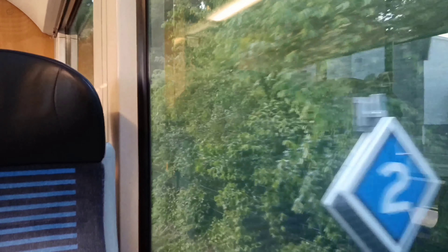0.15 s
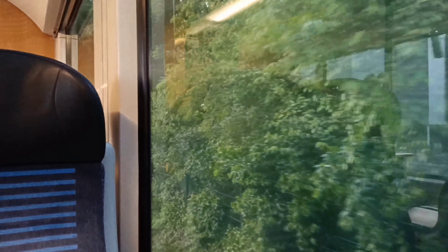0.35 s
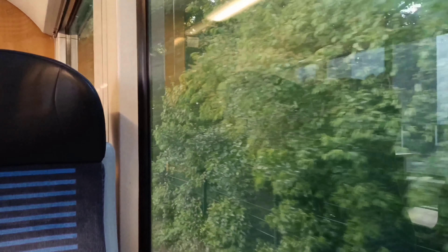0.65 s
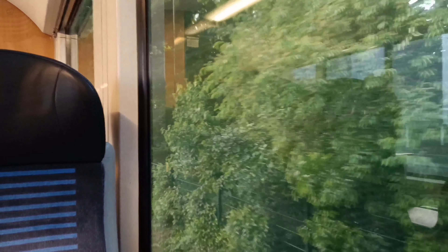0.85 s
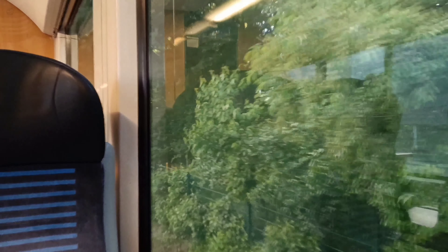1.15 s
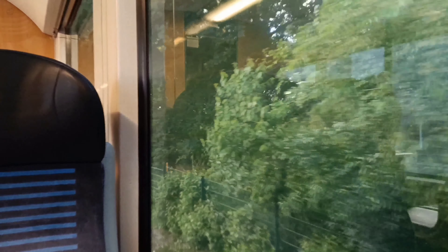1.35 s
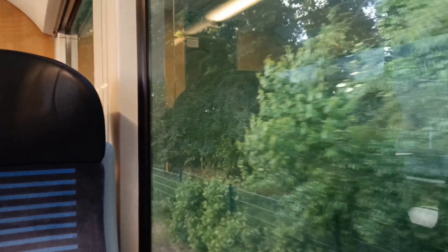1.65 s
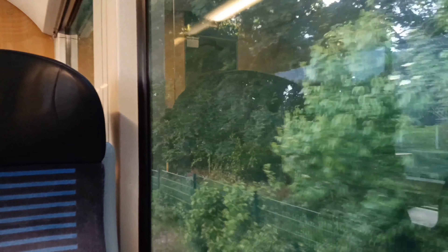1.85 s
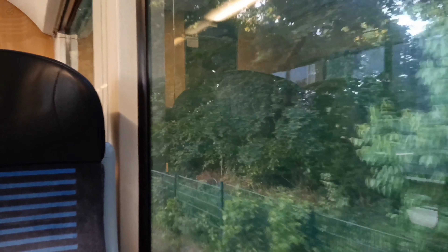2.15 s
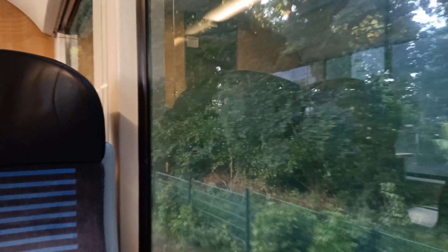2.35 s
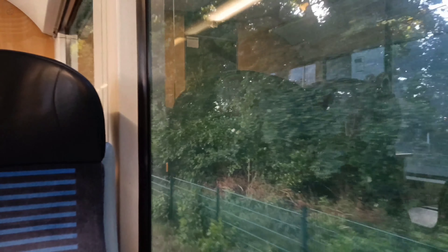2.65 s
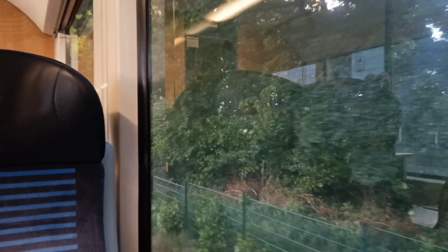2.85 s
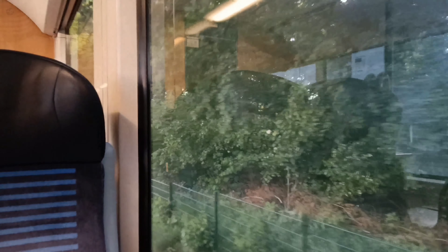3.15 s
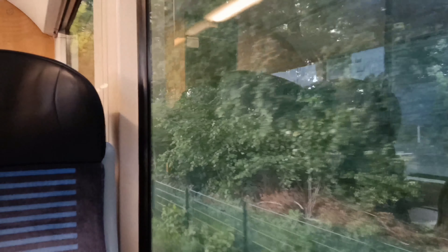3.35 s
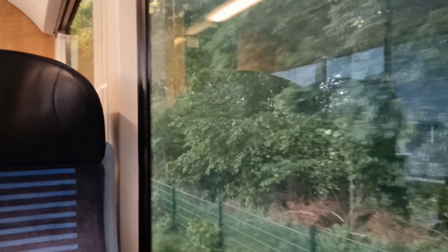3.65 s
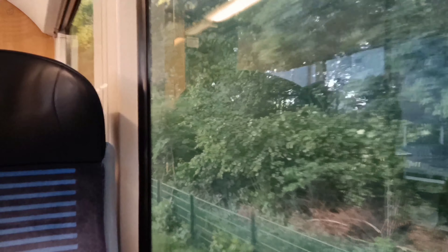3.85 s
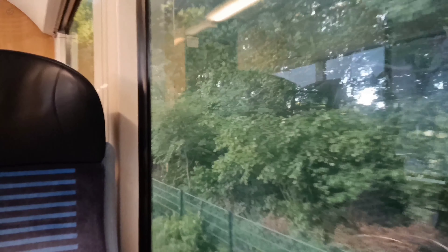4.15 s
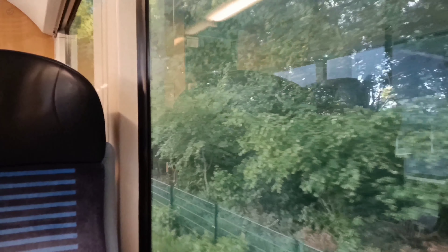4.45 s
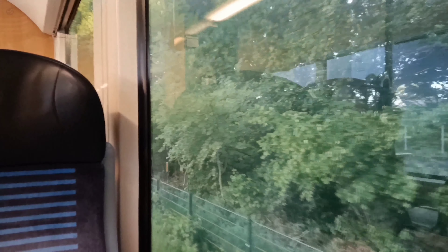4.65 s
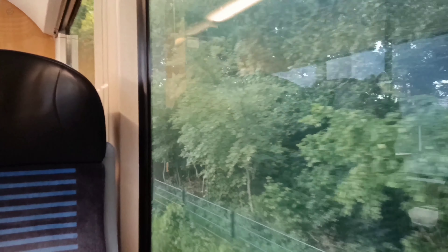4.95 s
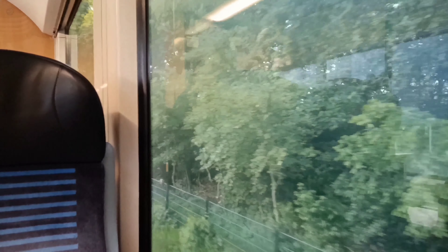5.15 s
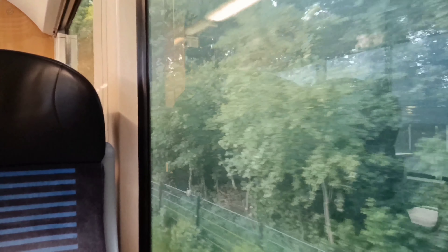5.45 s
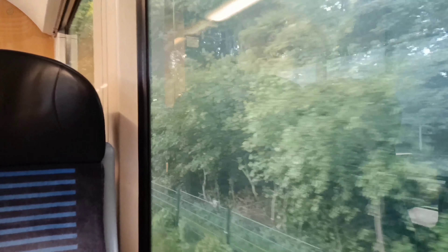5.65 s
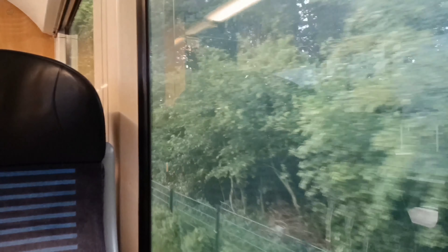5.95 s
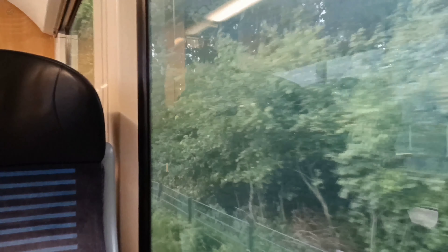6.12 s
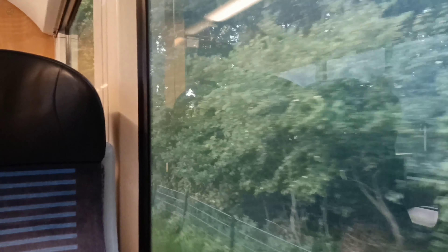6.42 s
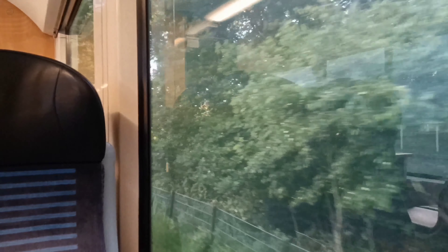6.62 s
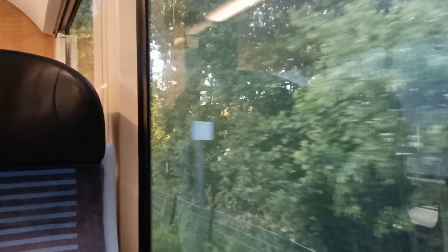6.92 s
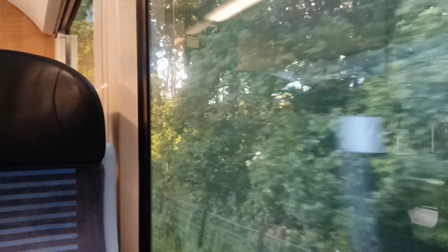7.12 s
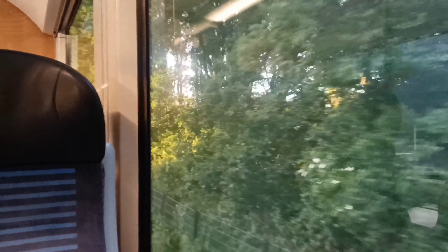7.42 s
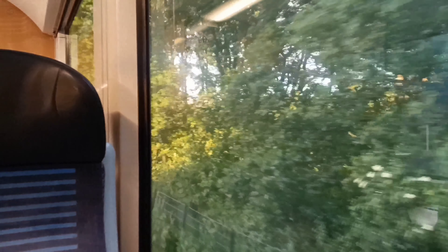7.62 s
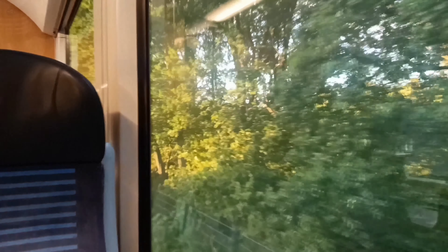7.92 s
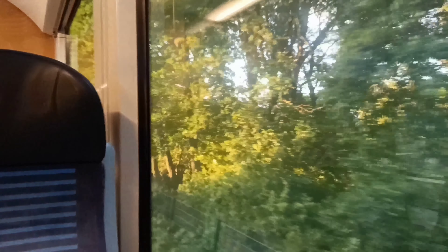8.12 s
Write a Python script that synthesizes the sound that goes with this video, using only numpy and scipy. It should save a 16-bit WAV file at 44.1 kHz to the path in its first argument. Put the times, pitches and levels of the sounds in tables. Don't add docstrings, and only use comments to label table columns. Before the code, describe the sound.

Heard from a window seat in a railcar: an underfloor diesel throbs low, strains and climbs steadily in pitch, swelling loudest before departure. A faint high whine rises. Just after four seconds the wheels roll, air and panel rush grows, brakes sigh, and trim ticks and squeaks. Later a floor panel drones and soft jolts shake the body. Close stereo cabin sound, bass heavy.

```python
import sys
import numpy as np
from scipy import signal
from scipy.fft import rfft, irfft, next_fast_len
from scipy.io import wavfile
from scipy.ndimage import uniform_filter1d

SR = 44100
rng = np.random.default_rng(int(sys.argv[2]) if len(sys.argv) > 2 else 0)


def gain_from_decibels(decibels):
    exponent = np.asarray(decibels, float) / 20
    return 10 ** exponent


def generate_wav(signal):
    frames = np.transpose(np.atleast_2d(signal))
    scaled = np.clip(frames, -1, 1) * 32767
    pcm = np.round(scaled).astype(np.int16)
    wavfile.write(sys.argv[1], SR, pcm)


N = 365148

# (time [s], frequency [Hz])
FIRING_RATE = [(0.0, 68.75), (0.25, 68.45), (0.75, 72.07), (1.5, 76.41), (1.75, 76.8), (2.5, 80.01),
               (3.25, 82.71), (4.0, 86.45), (4.25, 86.67), (4.75, 89.46), (5.0, 90.63), (5.25, 90.87),
               (5.5, 90.23), (5.75, 90.09), (6.25, 91.01), (8.28, 93.6)]
# (time [s], level [dB])
FIRING_LEVEL = [(0, -20.5), (.25, -14.5), (.62, -19.5), (.8, -14.5), (1.28, -20), (1.5, -24.5), (1.78, -11),
                (2.6, -7.5), (2.9, -10.5), (3.55, -10.5), (3.9, -15), (4.35, -12.5), (5.1, -16), (5.7, -15),
                (7.0, -15.5), (7.9, -20.5), (8.28, -19)]
# (multiple [1], level [dB])
CYCLE_ORDERS = [(2.04, -31), (3.976, -37), (4.962, -30), (7.03, -36), (8.06, -51), (9, -39), (9.97, -47),
                (11, -50.5), (13, -51), (14.2, -50.5), (15, -48), (16.97, -50), (19.92, -55.5), (21, -56.5),
                (21.95, -56), (23.07, -58), (24, -51), (26, -64), (28, -53.5), (30, -59), (36, -59),
                (41.9, -56.5), (45.1, -70.5), (47.6, -68.5), (56, -69.5), (60.3, -64), (53.75, -65),
                (65.5, -63), (71, -71.5), (82.8, -69)]
# (frequency [Hz], width [Hz], lift [dB])
SALOON_MODES = [(27, 4, -1), (66, 8, 4), (105.6, 18, 4), (200, 24, 6), (350, 10, 8), (366, 10, 7),
                (385, 6, 6), (422, 16, 12), (452, 7, 8), (570, 12, 10), (606, 14, 12), (728, 30, 6),
                (856, 70, 9), (1030, 63, 9)]
# (multiple [1], start [s], length [s], lift [dB])
PANEL_SPELLS = [(5, 7.9, 1.5, 19), (11, 4.3, 2.4, 12), (14, 5.8, 2.7, 3), (9, 0.59, 0.93, 8.5),
                (21, .79, .43, 14.5), (26, 7.7, 0.8, 17.5), (28, 5.5, 5.2, 5.5), (30, 3.12, .85, 9.5),
                (30, 4.8, 1.5, 4.5), (36, 2, 0.091, 11.5), (42, 1.8, .32, 11.5), (42, 2.03, 0.26, 23),
                (60, 4.4, 2.1, 8), (28, 1.2, 0.31, 10), (15, 1.6, .7, 8.5), (42, 3.8, .7, 6),
                (42, 4.6, 4, 3), (24, 3.6, 1.1, 4), (9, 5.33, 1.07, 7.5), (36, 1.3, .7, -8),
                (24, 5.6, 2.2, 4), (30, 1.62, 0.38, 10.5), (15, 2.3, .6, 4), (54, 7.2, 1.1, 10),
                (48, 6.75, 1.3, 16), (66, 1.3, 1.2, 7), (56, 3.7, 1, 9.5), (56, 1.5, 0.38, 13)]
# (frequency [Hz], width [Hz], lift [dB])
FLOOR_MODES = [(86.3, 9.5, 22), (95.25, 3.2, 10), (100.6, 3.8, 8.5), (152.1, 5, 9.5), (137.7, 4, 5.5),
               (173.73, 4.4, 14.5), (178, 1.3, 5.5), (188.3, 7, 12.5), (161.4, 4, 6), (229.9, 3.2, 18.5),
               (234, 3.2, 15.5), (247.57, 7.2, 24), (252.5, 6.2, 12), (271.9, 7, 14)]
# (start [s], length [s], rumble lift [dB], half-rate shake lift [dB])
BODY_JOLTS = [(0.556, .3, 5.5, -10), (1.403, 1.4, 10, 1), (4.048, 0.42, 9.5, 2), (5.354, 0.47, 3, 14.5),
              (5.623, 0.4, 5, 18), (5.9, .5, 7, 19), (6.953, 0.54, 2.5, 18), (7.203, 0.33, 3.5, 12.5),
              (7.365, 0.26, 7.5, -1), (7.563, .25, 0, 26), (7.887, 0.53, 3.5, 20)]
PUMP_RATIO = 1.222
# (time [s], frequency [Hz])
WHINE_PITCH = [(1.2, 6635), (2.0, 7147), (2.6, 7401), (3.8, 8064), (5.0, 8818), (5.8, 9384), (6.2, 9622),
               (6.6, 9752), (7.4, 9918), (8.28, 10007)]
# (frequency [Hz], level [dB])
FLOOR_LEAKAGE = [(6636, -68), (7380, -66), (7450, -105), (8020, -105), (8100, -74.5), (8750, -56.5),
                 (9500, -58.5), (9930, -48)]
# (frequency [Hz], density [dB per Hz])
RUMBLE_SPECTRUM = [(12, -120), (16, -3), (30, -10.5), (60, -0.5), (95, -3), (125, -17.5), (180, -9),
                   (300, -30), (400, -43), (500, -120)]
# (frequency [Hz], density [dB per Hz])
ROAR_SPECTRUM = [(120, -27.5), (200, -5), (230, -10), (317, -13.5), (433, -8), (482, -13), (631, -16),
                 (733, -23), (861, -18.5), (1350, -24.5), (1640, -21.5), (1810, -29.5), (2600, -32.5),
                 (3380, -50.5), (5720, -120)]
# (frequency [Hz], density [dB per Hz])
HISS_SPECTRUM = [(880, -36.5), (1500, -6.5), (1640, -5.5), (1830, -1.5), (2000, -0.5), (3220, -8.5),
                 (4420, -8), (5070, -11), (6690, -11), (7690, -17.5), (10700, -16), (12600, -21),
                 (15100, -17.5), (16000, -22)]
# (frequency [Hz], width [Hz], lift [dB])
PANEL_MODES = [(855, 38, 7.5), (1070, 72, 5), (1102, 12, 5), (1460, 18, 5), (1660, 61, 4), (1910, 160, 1),
               (2200, 64, 2.5), (2530, 82, 1.5), (4430, 99, 3)]
# (start [s], length [s], level [dB])
DRONE_SPELLS = [
    (1.107, 0.32, -47.5),
    (3.803, 0.61, -57),
    (6.031, 1.3, -33.5),
]
# (frequency [Hz], density [dB per Hz])
DRONE_SPECTRUM = [(250, -55.0), (320, -15.0), (350, -2.5), (380, -6.5), (440, -14.5), (520, -63)]
# (time [s], peak level [dB], t60 [s], left minus right [dB])
TRIM_TICKS = [
    (1.1252, -57.5, 0.092, 6.5),
    (2.3494, -57, 0.071, 4),
    (2.8588, -49, 0.062, 3),
    (4.936, -39.5, 0.1, -5),
]
# (frequency [Hz], level [dB])
TICK_SPECTRUM = [(1500, -21), (3000, -4.5), (6000, 2), (8500, -2), (11000, -3), (14500, 0.5), (16000, -8)]
# (start [s], length [s], frequency [Hz], level [dB], left minus right [dB])
TRIM_SQUEAKS = [
    (4.448, 0.31, 2146, -58.5, 1),
    (4.75, 0.043, 4140, -59.5, -17),
    (4.805, .05, 3710, -55, -6),
    (4.811, 0.043, 3970, -54, -3),
    (4.848, .08, 2940, -63, -8),
    (4.877, 0.18, 3950, -66, -5.5),
    (6.95, .22, 3400, -58, 11),
    (7.75, 0.099, 3440, -55, -3),
]
# (frequency [Hz], correlation [1])
LIKENESS = [(60, 0.99), (110, 1), (200, 1), (380, 0.69), (700, 0.18), (1290, -0.19), (2380, -0.06),
            (4400, 0.045), (8120, -0.071), (15000, 0.42)]
# (frequency [Hz], left minus right [dB])
IMBALANCE = [(30, 0), (70, 0.5), (78, -2.5), (90, 0.5), (180, 2.5), (500, -0.5), (2700, 0.5), (4200, 2),
             (6000, 3.5), (7200, 10), (7900, -6.5), (10000, 1), (12500, 0), (15000, 9)]
# (low edge [Hz], high edge [Hz], mean sag [dB], scatter [dB])
TREBLE_SAG = [
    (1150, 2300, 2, 1),
    (2250, 4000, 2.5, 3.5),
    (3930, 7500, 2, 6),
    (7450, 11000, 3, 3.5),
    (11000, 16000, 2.5, 2.2),
]


def unit(x):
    return x / np.sqrt(np.mean(x ** 2) + 1e-20)


def along(points, hz):
    f, v = np.transpose(points)
    return np.interp(np.log(hz + 1), np.log(f + 1), v)


def curves(rows):
    s, *cols = np.transpose(rows)
    return [np.interp(np.arange(N) / SR, s, c) for c in cols]


def wobble(rate):
    return np.interp(np.arange(N) * rate / SR, np.arange(4000), rng.standard_normal(4000))


def window(start, length):
    progress = np.clip((np.arange(N) / SR - start) / length, 0, 1)
    return np.sin(np.pi * progress) ** 0.58


def filtered(x, response):
    m = next_fast_len(N + 8192)
    hz = np.fft.rfftfreq(m, 1 / SR)
    return irfft(rfft(x, m) * response(hz), m)[..., :N]


def half_phase(hz):
    return np.arccos(np.clip(along(LIKENESS, hz), -1, 1)) / 2


def pan(db):
    return gain_from_decibels([[db / 2], [-db / 2]])


def tone(phase, hz, db, spread):
    lead = spread * half_phase(np.mean(hz))
    return np.sqrt(2) * gain_from_decibels(db) * np.array([np.sin(phase + lead), np.sin(phase - lead)])


def rush(spectrum, patchy_db):
    z = signal.stft(rng.standard_normal((2, N)), nperseg=512)[2]
    field = uniform_filter1d(rng.standard_normal(z.shape[1:]), size=5, axis=0)
    field = uniform_filter1d(field, size=12, axis=1)
    pair = signal.istft(z * gain_from_decibels(patchy_db * unit(field)), nperseg=512)[1][:, :N]

    def response(hz):
        angle = half_phase(hz)
        return gain_from_decibels(along(spectrum, hz)) * [np.cos(angle), np.sin(angle)]

    mid, side = filtered(pair, response)
    return unit(np.array([mid + side, mid - side]))


def lift(resonances, hz):
    return sum(gain_db / (1 + (2 * (hz - centre) / width) ** 2) for centre, width, gain_db in resonances)


def jolts():
    return sum(np.outer([rumble_db, shake_db], window(s, length) ** 2)
               for s, length, rumble_db, shake_db in BODY_JOLTS)


def effort():
    t = np.arange(N) / SR - 4.23
    rise_s = 0.39
    rolling_db = 2 * np.clip(t / rise_s, 0, 1) + 1 * np.clip(t - rise_s, 0, None)
    brake_sigh_db = 1.4 * window(4.7, 1) ** 4
    labour_db = 4.5 * window(1.0, 1.58) ** 4
    return rolling_db + brake_sigh_db + labour_db


def firing_notes(firing, firing_hz):
    firing_db, = curves(FIRING_LEVEL)
    second_db = -38.5 + lift(FLOOR_MODES, 2 * firing_hz) + wobble(6)
    third_db = -51 + lift(FLOOR_MODES, 3 * firing_hz) + wobble(6)
    unsteady_db = 0.25 * wobble(12)
    return sum(tone(k * firing + k, k * firing_hz, db + k * unsteady_db, spread=0.75)
               for k, db in enumerate([firing_db, second_db, third_db], 1))


def frame_shake(firing, firing_hz):
    shake_db = -46.5 + jolts()[1] + 2 * wobble(7.2)
    return tone(firing / 2, firing_hz / 2, shake_db, spread=0.8)


def engine_orders(firing, firing_hz):
    out = np.zeros((2, N))
    surge_db = 3.8 * window(1.4, 0.71)
    for k, db in CYCLE_ORDERS:
        hz = firing_hz * k / 6
        lift_db = lift(SALOON_MODES, hz)
        lift_db += sum(gain_db * window(s, length) for m, s, length, gain_db in PANEL_SPELLS if m == k)
        lift_db += surge_db * (k > 8)
        phase = firing * k / 6 + rng.uniform(0, 2 * np.pi)
        drift = 0.3 * wobble(2)
        uneven_db = wobble(3) + 1.5 * wobble(14)
        out += tone(phase + drift, hz, db + lift_db + uneven_db, spread=rng.choice([-1, 1]))
    return out


def pump(firing, firing_hz):
    pulse_hz = PUMP_RATIO * firing_hz
    pulse_db = -42 + lift(FLOOR_MODES, pulse_hz) + 2.1 * wobble(14)
    pulses = tone(PUMP_RATIO * firing, pulse_hz, pulse_db, spread=0.8)
    turns = tone(PUMP_RATIO / 3 * firing, firing_hz / 2, -38 + 3 * wobble(0.4), spread=0.8)
    return pulses + turns


def engine():
    firing_hz, = curves(FIRING_RATE)
    firing = 2 * np.pi * np.cumsum(firing_hz) / SR
    notes = firing_notes(firing, firing_hz) + frame_shake(firing, firing_hz)
    return notes + engine_orders(firing, firing_hz) + pump(firing, firing_hz)


def turbo():
    hz, = curves(WHINE_PITCH)
    asleep = np.clip((1.3 - np.arange(N) / SR) * 10, 0, 1)
    db = along(FLOOR_LEAKAGE, hz) + 2 * wobble(9) - 60 * asleep
    blur_hz = 16 * wobble(45)
    phase = 2 * np.pi * np.cumsum(hz + blur_hz) / SR
    flutter_db = 3 * np.array([wobble(45), wobble(40)])
    line = gain_from_decibels(flutter_db - 3.0) * tone(phase, hz, db, spread=1.21)
    scatter = unit(filtered(rng.standard_normal((2, N)), lambda f: 1 / (1 + (f / 90) ** 2)))
    skirt = gain_from_decibels(db - 2.5) * scatter * np.sqrt(2) * np.cos(phase)
    return (line + skirt) * pan(-1.4)


def body():
    rumble_db = -35.5 + jolts()[0]
    roar_db = -45 + 0.71 * effort()
    hiss_db = -57 + effort()
    rumble = gain_from_decibels(rumble_db + 2.0 + 0.82 * wobble(3)) * rush(RUMBLE_SPECTRUM, patchy_db=-3.5)
    roar = gain_from_decibels(roar_db + 4.5 + 0.67 * wobble(4.6)) * rush(ROAR_SPECTRUM, patchy_db=0.9)
    hiss = gain_from_decibels(hiss_db + 7 + 1.1 * wobble(8)) * rush(HISS_SPECTRUM, patchy_db=1.1)
    knots = rng.standard_normal((2, 800))

    def colour(hz):
        ripple_db = 2.2 * np.array([np.interp(hz / 25, np.arange(800), row) for row in knots])
        return gain_from_decibels(lift(PANEL_MODES, hz) + ripple_db - 0.82)

    return rumble + filtered(roar + hiss, colour)


def growl():
    envelope = sum(gain_from_decibels(db) * window(s, length) for s, length, db in DRONE_SPELLS)
    return envelope * rush(DRONE_SPECTRUM, patchy_db=12.0)


def ticks():
    out = np.zeros((2, N))
    t = np.arange(SR // 4) / SR
    for s, db, t60, pan_db in TRIM_TICKS:
        crack = gain_from_decibels(-60 * t / 0.0055)
        scrape = 1.2 * gain_from_decibels(-60 * (t / t60) ** 2)
        burst = gain_from_decibels(db - 1.5) * (crack + scrape) * rng.standard_normal((2, len(t)))
        out[:, round(s * SR):][:, :len(t)] += burst * pan(pan_db)
    return filtered(out, lambda hz: gain_from_decibels(along(TICK_SPECTRUM, hz)))


def squeaks():
    out = np.zeros((2, N))
    for s, length, hz, db, pan_db in TRIM_SQUEAKS:
        swell = window(s, length) * gain_from_decibels(3 * wobble(45))
        phase = 2 * np.pi * np.cumsum(hz * (1 + 0.014 * wobble(200))) / SR
        out += swell * tone(phase, hz, db, spread=0.42) * pan(pan_db)
    return out


def scene():
    return engine() + turbo() + body() + growl() + ticks() + squeaks()


def sagging_treble(x):
    frame = (np.arange(N) - 1080) / 1024 + 1
    seam = np.cos(np.pi * frame) ** 2
    shared = rng.standard_normal(N // 1024 + 4)
    for low_hz, high_hz, sag_db, scatter_db in TREBLE_SAG:
        luck = 0.8 * shared + 0.8 * rng.standard_normal(len(shared))
        depth_db = np.abs(sag_db + scatter_db * luck)[np.round(frame).astype(int)]
        band = filtered(x, lambda hz: (hz >= low_hz) * (hz < high_hz))
        x = x + band * (gain_from_decibels(-depth_db * seam) - 1)
    starved = np.interp(frame, np.arange(len(shared)) + 0.5, rng.standard_normal(len(shared)) < 1.1)
    x[1] -= filtered(x[1], lambda hz: hz > 13100) * starved
    return x


def roll_off(x):
    return signal.sosfilt(signal.butter(12, 16610, fs=SR, output="sos"), x)


def record(dry):
    sides = np.array([[1], [-1]])
    x = filtered(dry, lambda hz: (hz < 15840) * gain_from_decibels(along(IMBALANCE, hz) / 2 * sides))
    x = sagging_treble(x)
    x /= (1 + np.abs(x / 0.74) ** 8) ** (1 / 8)
    return roll_off(x)


dry = scene()
out = record(dry)
generate_wav(out)
```